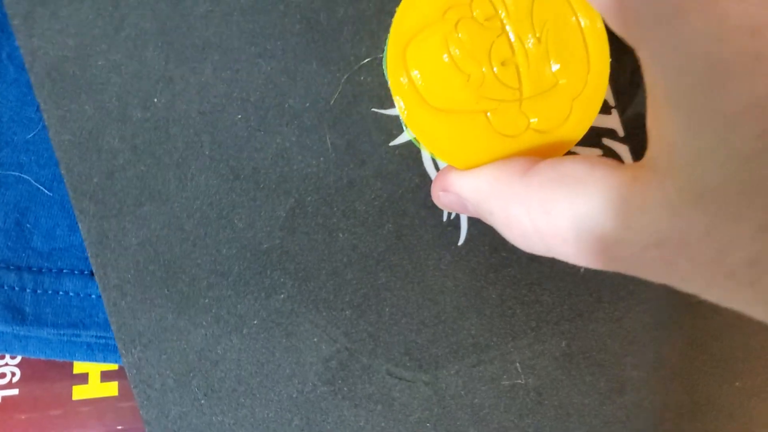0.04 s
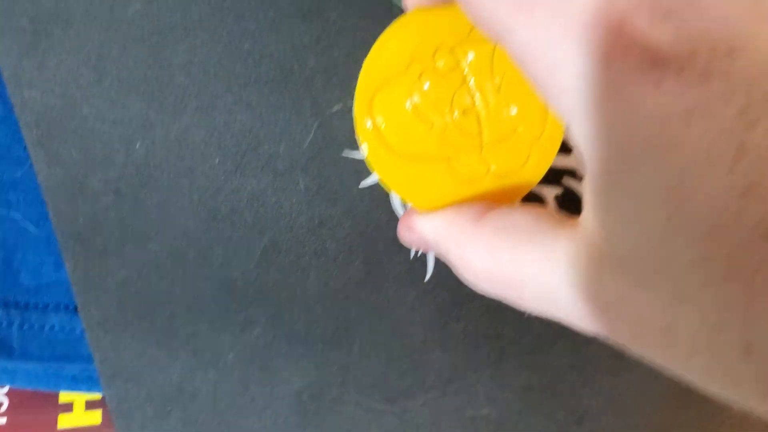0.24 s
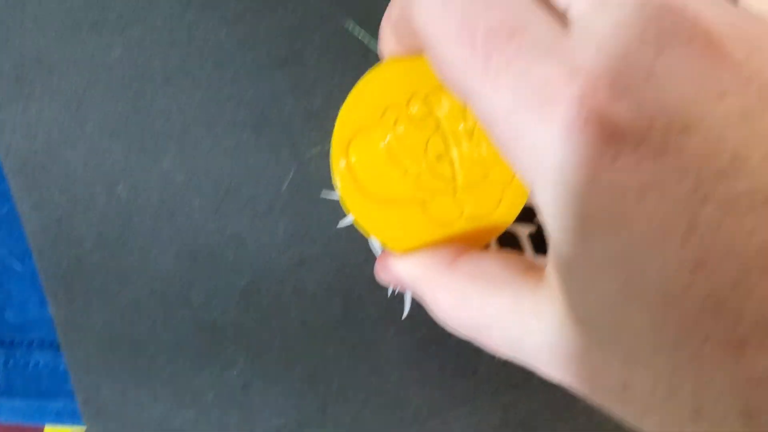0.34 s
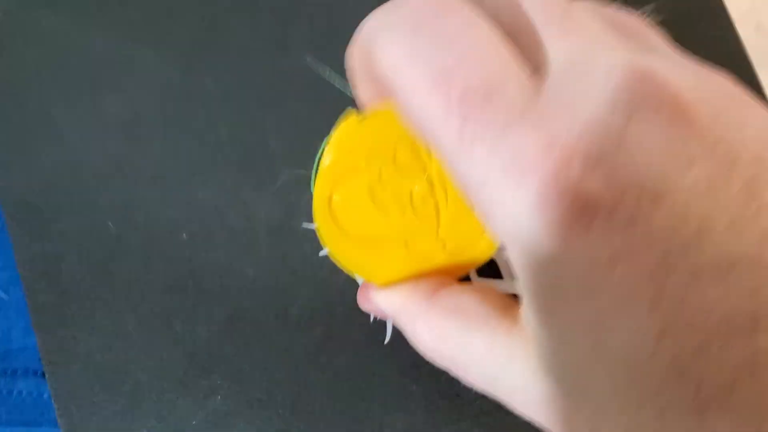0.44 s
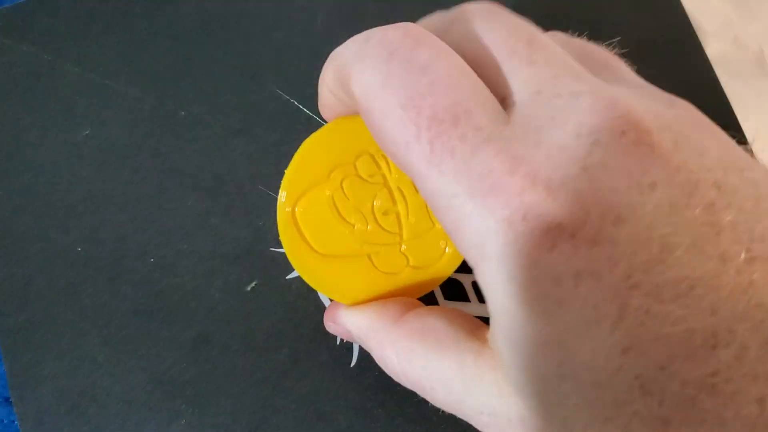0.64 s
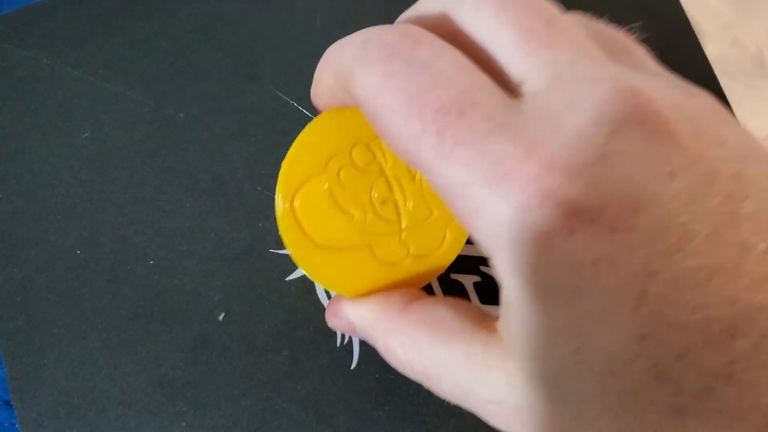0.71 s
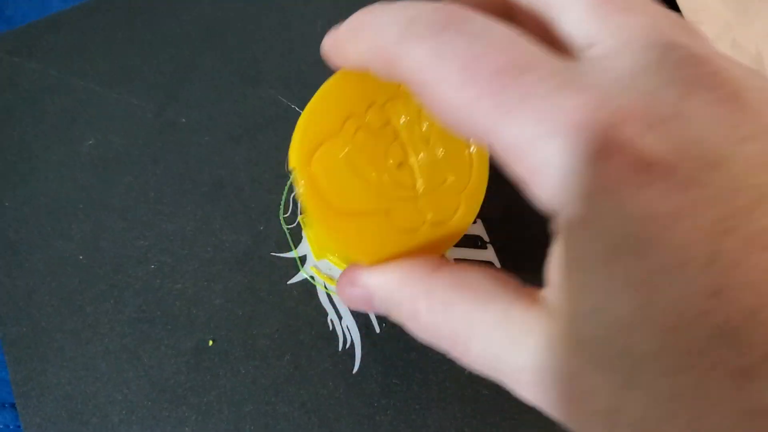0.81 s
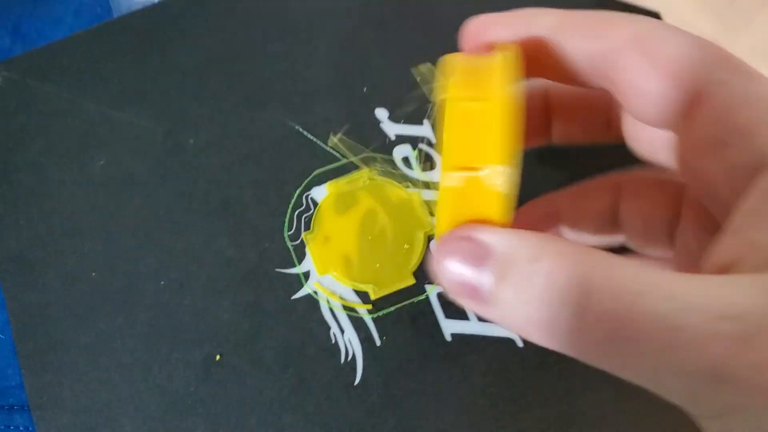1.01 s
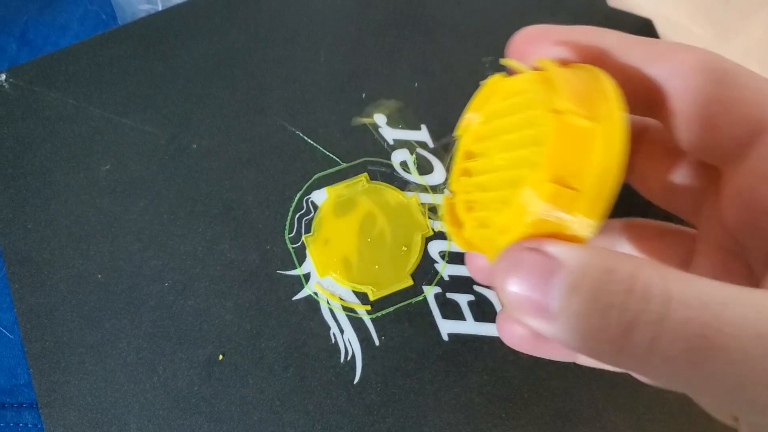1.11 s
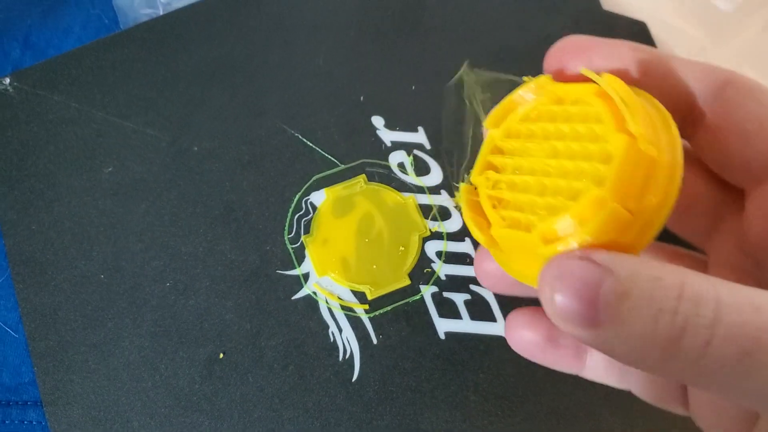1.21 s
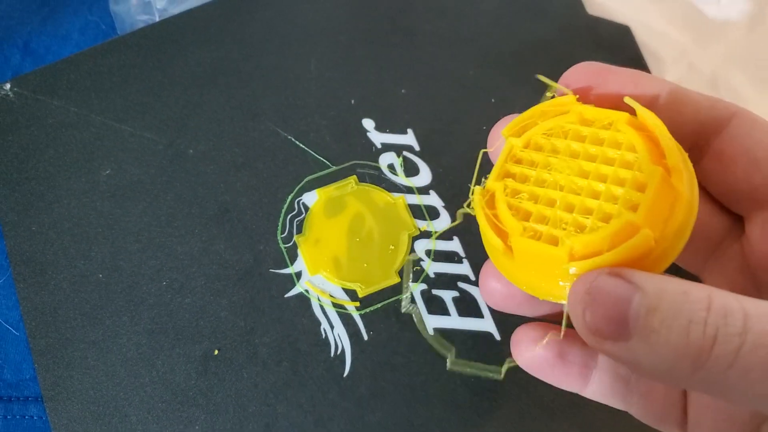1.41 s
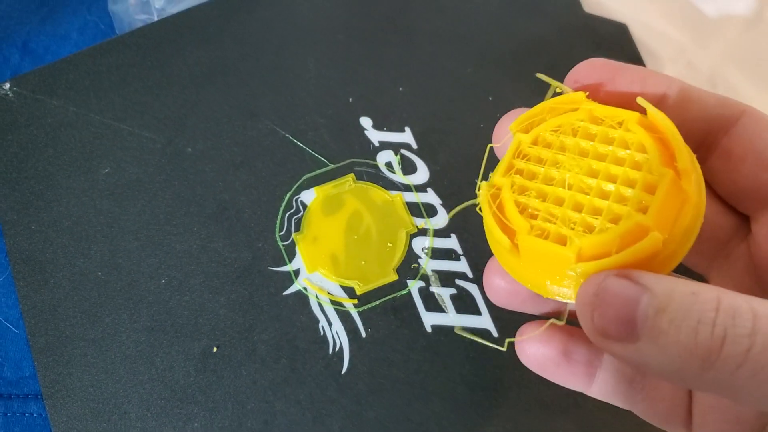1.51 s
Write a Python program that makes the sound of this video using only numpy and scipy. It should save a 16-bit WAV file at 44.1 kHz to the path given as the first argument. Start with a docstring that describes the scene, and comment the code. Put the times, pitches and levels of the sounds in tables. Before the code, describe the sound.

A hollow plastic print snaps off a printer bed in one sharp, splintering crack. Fingers rub faintly before it, then squeak and tap as they turn the part over, close to the microphone in a small room.

```python
"""A hollow plastic print snaps off a printer bed, close to the microphone in a small room.
Its base tears in a quick run of cracks that knock the bed plate, spray splinter clicks and ring the frame.
Fingers rub, squeak and tap as they grip the part and turn it over, and their pushes wobble the sprung bed.
The freed part rocks on the plate with soft bumps, and a hand slides briskly at the end."""
import sys
import numpy as np
from scipy import signal
from scipy.fft import rfft, irfft
from scipy.io import wavfile

SR = 44100
rng = np.random.default_rng(int(sys.argv[2]) if len(sys.argv) > 2 else 0)


def waveform_to_disk(signal):
    """Save audio, clipped to [-1, 1], as 16-bit WAV at the path in sys.argv[1]."""
    frames = np.transpose(np.atleast_2d(signal))
    scaled = np.clip(frames, -1, 1) * 32767
    samples = np.round(scaled).astype(np.int16)
    wavfile.write(sys.argv[1], SR, samples)


N = 68355


def amp(db):
    """Decibels to gain."""
    return 10 ** (np.asarray(db) / 20)

def unit_rms(x):
    """Scales to rms 1."""
    return x / np.sqrt(np.mean(x ** 2) + 1e-20)

def curve_at(points, hz):
    """Reads a curve on a log-frequency axis."""
    freqs, values = np.transpose(points)
    return np.interp(np.log(hz + 1), np.log(freqs + 1), values)

def add(mix, start_s, sound):
    """Mixes a sound in at its cue."""
    part = mix[..., max(round(start_s * SR), 0):][..., :sound.shape[-1]]
    part += sound[..., :part.shape[-1]]

def convolve(x, response):
    """Filters each channel."""
    return signal.fftconvolve(np.atleast_2d(x), np.atleast_2d(response), axes=1)[:, :N]

def colour(eq, size=4096):
    """Minimum-phase impulse of energy 1 with the given EQ curve."""
    log_gain = np.log(amp(curve_at(eq, abs(np.fft.fftfreq(size, 1 / SR)))))
    impulse = np.fft.ifft(np.exp(np.conj(signal.hilbert(log_gain)))).real[:size // 2]
    return impulse / np.linalg.norm(impulse)

def left_mic(x, eq):
    """The left microphone is shadowed in some bands: an EQ on that channel alone."""
    gain = amp(curve_at(eq, np.fft.rfftfreq(N, 1 / SR)))
    return np.array([irfft(rfft(x[0]) * gain, N), x[1]])

# Likeness of left and right: freq_hz, correlation
STEREO_LIKENESS = [(60, 0.89), (1200, 0.42), (5000, 0.37), (15000, 0.033)]
def mic_pair(x):
    """Two unrelated signals become a microphone pair: alike in the bass, apart in the treble."""
    likeness = curve_at(STEREO_LIKENESS, np.fft.rfftfreq(x.shape[1], 1 / SR))
    angle = np.arccos(np.clip(likeness, -1, 1)) / 2
    mid, side = rfft(x) * [np.cos(angle), np.sin(angle)]
    return irfft([mid + side, mid - side], x.shape[1])

def stereo_noise(eq):
    """Steady coloured noise at rms 1."""
    return unit_rms(convolve(mic_pair(rng.standard_normal((2, N))), colour(eq)))

# Reverb decay of the small room: freq_hz, t60_s
ROOM_DECAY = [(500, 0.25), (1700, 0.13), (15000, 0.13)]
def room(x, wet_db, predelay_s=0.0016, size=16384):
    """Adds dense reflections that die faster in the treble."""
    hz, t, bands = signal.stft(mic_pair(rng.standard_normal((2, size))), SR, nperseg=256)
    tail = signal.istft(bands * amp(-60 * t / curve_at(ROOM_DECAY, hz)[:, None]), SR)[1]
    tail[:, :round(predelay_s * SR)] = 0
    return x + amp(wet_db) * convolve(x, tail / np.linalg.norm(tail[0]))

# Bass-heavy air of the room: freq_hz, gain_db
AIR_EQ = [(70, -1), (150, -19.5), (400, -20.5), (700, -31), (2050, -30.5), (2580, -21), (3000, -48),
          (15500, -48)]
def room_tone(level_db=-61.5):
    """Quiet steady air under the whole scene."""
    return amp(level_db) * stereo_noise(AIR_EQ)

def stroke(start_s, length_s, t60_s, attack_s=0.0067):
    """Envelope of a touch: it swells, holds and dies away."""
    t = np.arange(N) / SR - start_s
    return np.clip(t / attack_s, 0, 1) * amp(-60 * np.maximum(t - length_s, 0) / t60_s)

def friction(response, slips_per_s=5100):
    """Dense tiny slips of uneven size excite a response; the result has rms 1."""
    slips = (rng.random((2, N)) < slips_per_s / SR) * rng.standard_normal((2, N))
    trim_db = -0.5 * np.minimum(rng.exponential(1, (2, N)), 4)
    return unit_rms(convolve(mic_pair(slips * amp(trim_db)), response))

# Finger strokes: start_s, length_s, body_db, hiss_db
FINGER_STROKES = [(0, 0.099, -58, -57.5), (0.142, 0.081, -58, -56), (0.213, 0.016, -36, -46.5),
                  (0.228, 0.065, -50, -54), (0.306, 0.23, -59, -52.5), (0.669, 0.22, -69.5, -79.5),
                  (0.815, 0.017, -62, -62.5), (0.848, 0.015, -45, -83), (0.863, 0.019, -51.5, -86),
                  (0.927, 0.029, -47.5, -55), (.98, 0.066, -52, -52.5), (1.129, 0.045, -66, -59),
                  (1.216, 0.052, -66, -58.5), (1.27, 0.067, -62.5, -55.5), (1.411, 0.015, -48.5, -58.5)]
# Dull body and fine hiss of the rub: freq_hz, gain_db
RUB_BODY_EQ = [(130, 7.5), (220, -2), (380, 4.5), (1300, -6), (2600, -13.5), (3600, -19), (6000, -35)]
RUB_HISS_EQ = [(500, -12.5), (1700, -3), (2250, 10), (2700, 7.5), (3600, 8.5), (4500, 2), (7500, -5.5),
               (15500, -4)]
# Left microphone's colour on the handling sounds: freq_hz, gain_db
HANDLING_LEFT_EQ = [(150, -2), (2500, -6), (3300, -20.5), (6500, -13.5), (8600, -2.5), (15000, -6.5)]
def finger_rubs():
    """Skin rubs on plastic, each stroke with its own blend of body and hiss."""
    power = sum((amp(levels_db)[:, None] * stroke(start_s, length_s, t60_s=0.25)) ** 2
                for start_s, length_s, *levels_db in FINGER_STROKES)
    body_envelope, hiss_envelope = np.sqrt(power)
    body = body_envelope * friction(colour(RUB_BODY_EQ))
    hiss = hiss_envelope * friction(colour(RUB_HISS_EQ))
    return left_mic(body + hiss, HANDLING_LEFT_EQ)

# Thin squeaks: start_s, length_s, pitch_hz, level_db
FINGER_SQUEAKS = [(0, 0.145, 12750, -86), (0.757, 0.05, 2630, -64.5), (0.863, 0.056, 2441, -50),
                  (0.984, 0.069, 2505, -56.5), (1.136, 0.0046, 2607, -53.5), (1.218, 0.062, 2700, -63)]
def finger_squeaks(bandwidth_hz=53):
    """The slips of a dragging touch keep one narrow resonance rasping."""
    out, t = np.zeros((2, N)), np.arange(N) / SR
    for start_s, length_s, pitch_hz, level_db in FINGER_SQUEAKS:
        resonance = np.exp(-np.pi * bandwidth_hz * t) * np.cos(2 * np.pi * pitch_hz * t)
        out += amp(level_db) * stroke(start_s, length_s, t60_s=0.12) * friction(resonance)
    return out

# Fingers and loose bits tapping: start_s, knock_db, tick_db
TAP_HITS = [(0.045, -62, -35), (0.2297, -28, -31.5), (0.8786, -52, -30.5), (0.9184, -57, -30.5),
            (0.936, -26.5, -30), (1.0178, -17, -20.5), (1.2869, -35, -26.5)]
# Dull push on the plate and crisp tick: freq_hz, gain_db
KNOCK_EQ = [(40, -3), (300, -8.5), (900, -5.5), (1600, -7.5), (2200, -23), (16000, -43.5)]
TICK_EQ = [(3500, 2), (15000, -3)]
KNOCK_WET_DB = -9
def taps(tick_t60_s=0.002, size=512):
    """Light contacts give a dull push and one crisp tick, too weak to ring the plate."""
    pushes, ticks, t = np.zeros(N), np.zeros((2, N)), np.arange(size) / SR
    for start_s, knock_db, tick_db in TAP_HITS:
        add(pushes, start_s, -amp([knock_db]))
        tick = rng.standard_normal((2, size)) * amp(-60 * t / tick_t60_s)
        add(ticks, start_s, amp(tick_db) * tick / np.linalg.norm(tick, axis=1, keepdims=True))
    dull = room(convolve(pushes, colour(KNOCK_EQ)), KNOCK_WET_DB)
    crisp = room(convolve(ticks, colour(TICK_EQ)), wet_db=-2.5)
    return dull + left_mic(crisp, HANDLING_LEFT_EQ)

# Low swings of the bed: start_s, length_s, pitch_hz, level_db
BED_SWINGS = [(0.205, .13, 62.7, -29.5), (0.314, 0.12, 52.5, -44.5), (0.424, 0.093, 80.8, -40.5),
              (0.819, 0.13, 58, -41), (1.403, 0.15, 60.5, -40.5)]
def bed_wobble(sag_hz_per_s=110):
    """Each push of the hand swings the bed on its springs: a low tone swells, sags and fades."""
    out = np.zeros(N)
    for start_s, length_s, pitch_hz, level_db in BED_SWINGS:
        t = np.arange(0, length_s, 1 / SR)
        arch = abs(np.sin(np.pi * t / length_s)) ** 0.34  # the low power flattens the top
        phase = 2 * np.pi * np.cumsum(pitch_hz - sag_hz_per_s * t) / SR
        add(out, start_s, amp(level_db) * arch * np.sin(phase))
    return out

# Cracks running through the base: start_s, knock_db, splinter_db, ring_db
BASE_CRACKS = [(0.4194, -18, -12, -36), (0.4228, -7.5, -6.5, -41.5), (0.4258, -8, -3.5, -18),
               (0.4281, -1.5, -9.5, -20), (0.4296, -17, -9.5, -29.5), (0.439, 2, -0.5, -16),
               (0.447, -12.5, -10.5, -20), (0.4521, -12, -17, -26), (0.4575, -16.5, -17, -11.5),
               (0.4718, -36.5, -16.5, -25.5), (0.4804, -13.5, -20, -46.5), (0.483, -22, -26.5, -32)]
def snap():
    """The base tears free; every crack fires three layers: knock, splinters and ring."""
    starts_s, knock_db, splinter_db, ring_db = np.transpose(BASE_CRACKS)
    return (plate_knocks(starts_s, knock_db) + splinters(starts_s, splinter_db)
            + frame_ring(starts_s, ring_db))

# Modes of the bed plate: pitch_hz, level_db, t60_s
PLATE_MODES = [(842, -20.5, 0.02), (1043, -15, 0.016), (1592, -22.5, 0.016)]
def plate_knocks(starts_s, levels_db, push_db=-7.5, attack_s=0.00023):
    """Each crack gives the plate a dull push and sets off its modes in a hollow knock."""
    out, t = np.zeros(N), np.arange(4096) / SR
    push = colour(KNOCK_EQ)
    modes = sum(amp(db - 60 * t / t60_s) * np.sin(2 * np.pi * hz * t) for hz, db, t60_s in PLATE_MODES)
    for start_s, level_db in zip(starts_s, levels_db):
        add(out, start_s, -amp(level_db + push_db) * push)
        add(out, start_s, -amp(level_db) * modes * np.minimum(t / attack_s, 1))
    return room(out, KNOCK_WET_DB)

# Bright bite of splintering plastic: freq_hz, gain_db
SPLINTER_EQ = [(200, -22.5), (2050, 0), (2500, 2), (4100, 2.5), (4550, 6.5), (5300, -0.5), (6100, 3.5),
               (7600, -4.5), (15500, -4.5)]
# Left microphone's colour on the splinters, duller around 3-5 kHz: freq_hz, gain_db
LEFT_MIC_EQ = [(2500, 3), (3100, -9), (4200, -10.5), (5300, -5), (8500, 5), (15000, -4.5)]
def splinters(starts_s, levels_db, spread_db=4, attack_s=0.0004, t60_s=0.034, size=4096):
    """Each crack sprays a burst of tiny fractures of uneven size."""
    out, t = np.zeros((2, N)), np.arange(1, size + 1) / SR
    envelope = np.minimum(t / attack_s, 1) * amp(-60 * t / t60_s)
    for start_s, level_db in zip(starts_s, levels_db):
        fractures = rng.standard_normal((2, size)) * amp(spread_db * rng.standard_normal(size))
        burst = mic_pair(fractures) * envelope
        add(out, start_s, amp(level_db) * burst / np.linalg.norm(burst[0]))
    return left_mic(room(convolve(out, colour(SPLINTER_EQ)), wet_db=3), LEFT_MIC_EQ)

# Modes of the printer frame: pitch_hz, level_db
FRAME_MODES = [(2315, -2.5), (2445, -5), (2560, -13), (2655, -4.5)]
def frame_ring(starts_s, levels_db, attack_s=0.0016, t60_s=0.033):
    """Each crack rings a cluster of close frame modes, with other phases at each microphone."""
    out, t = np.zeros((2, N)), np.arange(8192) / SR
    phases = np.array([[0], [1]]) * rng.normal(0, 1.0, len(FRAME_MODES))
    modes = sum(amp(db) * np.sin(2 * np.pi * hz * (t - attack_s) + phases[:, k, None])
                for k, (hz, db) in enumerate(FRAME_MODES))
    ring = np.minimum(t / attack_s, 1) * amp(-60 * t / t60_s) * modes / 2
    for start_s, level_db in zip(starts_s, levels_db):
        add(out, start_s, amp(level_db) * ring)
    return room(out, wet_db=-4)

# Bumps of the freed part: start_s, pitch_hz, level_db
PART_BUMPS = [(0.496, 640, -36.5), (0.551, 1040, -47.5), (0.558, 742, -48.5), (0.933, 1340, -47.5)]
def rocking_part(length_s=0.0065):
    """Each rock of the part on the plate is a soft, rounded knock with its own pitch."""
    out, t = np.zeros(N), np.arange(0, length_s, 1 / SR)
    arch = np.sin(np.pi * t / length_s)
    for start_s, pitch_hz, level_db in PART_BUMPS:
        add(out, start_s, amp(level_db) * arch * np.sin(2 * np.pi * pitch_hz * t))
    return room(out, KNOCK_WET_DB)

# Fade-in of the closing slide: time_s, level_db
SLIDE_FADE = [(1.439, -55), (1.465, -40.5), (1.51, -39)]
# Broad swish of the hand: freq_hz, gain_db
SLIDE_EQ = [(100, 3), (260, -12), (1000, -4.5), (1350, -8), (2800, -3.5), (3450, 4), (3900, -4),
            (9000, -10.5), (15500, -16.5)]
def hand_slide():
    """A hand slides briskly: friction noise swells and holds to the end."""
    level_db = np.interp(np.arange(N) / SR, *np.transpose(SLIDE_FADE), left=-np.inf)
    return left_mic(amp(level_db) * stereo_noise(SLIDE_EQ), HANDLING_LEFT_EQ)

def scene():
    """The snap and the rocking part, with handling sounds and room tone around them."""
    return (snap() + rocking_part() + taps() + bed_wobble()
            + finger_rubs() + hand_slide() + finger_squeaks() + room_tone())

def record(dry, cutoff_hz=15900):
    """A steep low-pass trims the very top of the mix."""
    lowpass = signal.firwin(511, cutoff_hz, window=("kaiser", 9), fs=SR)
    return signal.oaconvolve(dry, lowpass[None], "same")


dry = scene()
out = record(dry)
waveform_to_disk(out)
```